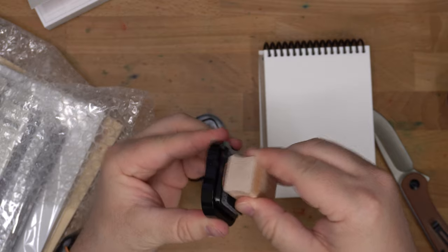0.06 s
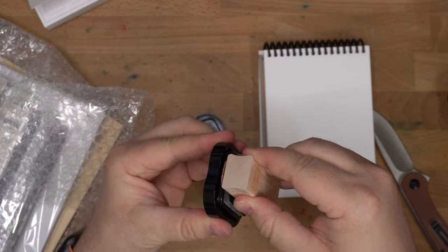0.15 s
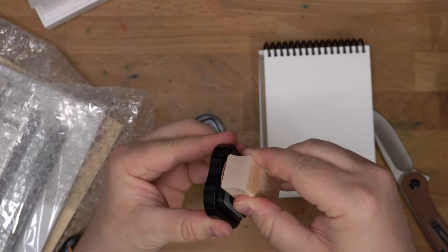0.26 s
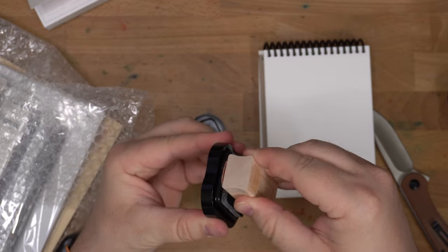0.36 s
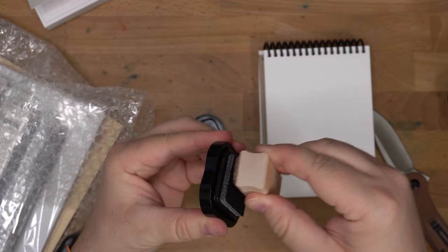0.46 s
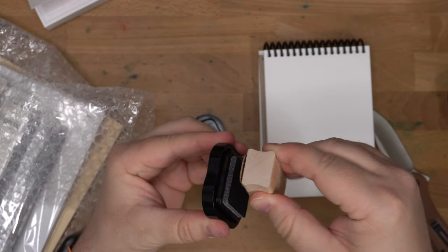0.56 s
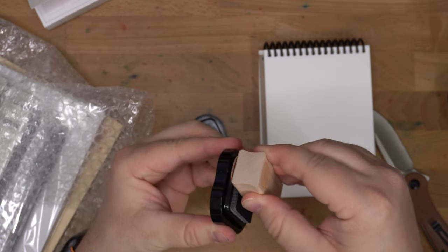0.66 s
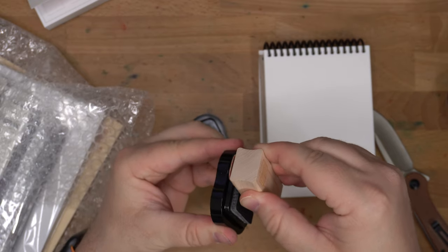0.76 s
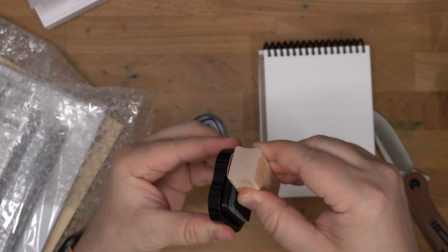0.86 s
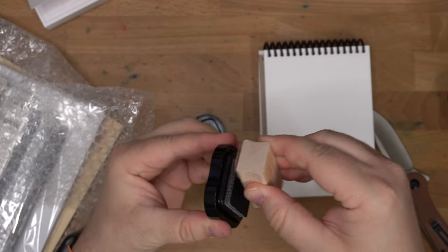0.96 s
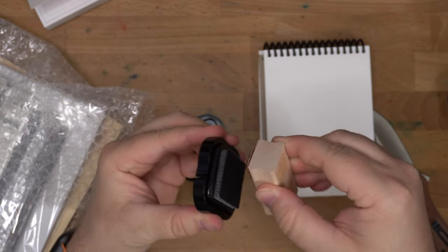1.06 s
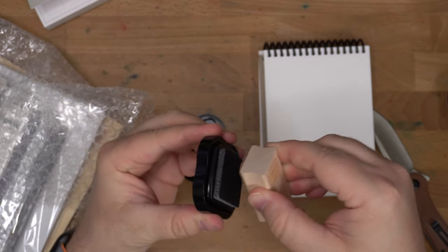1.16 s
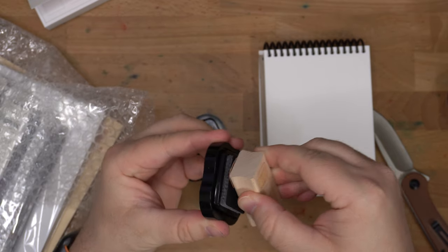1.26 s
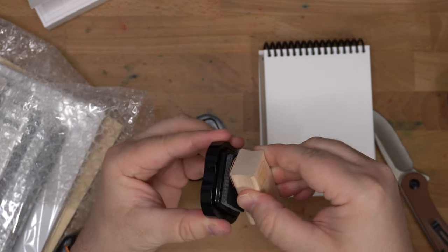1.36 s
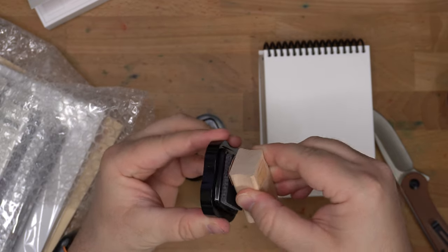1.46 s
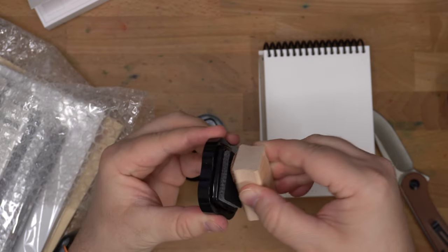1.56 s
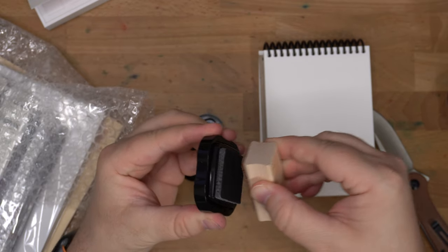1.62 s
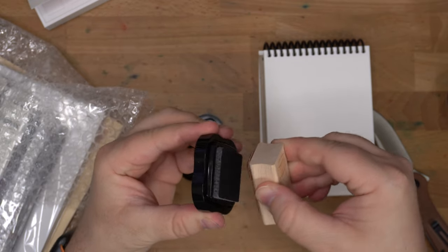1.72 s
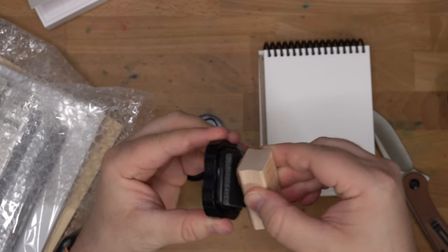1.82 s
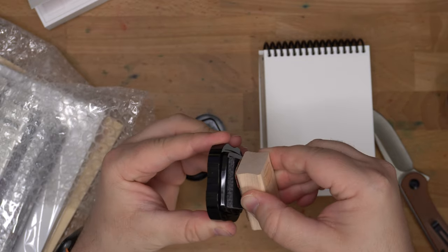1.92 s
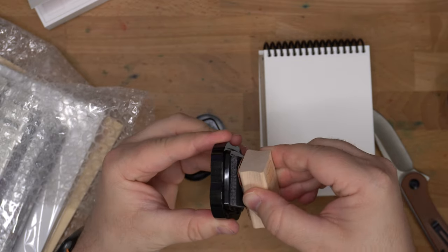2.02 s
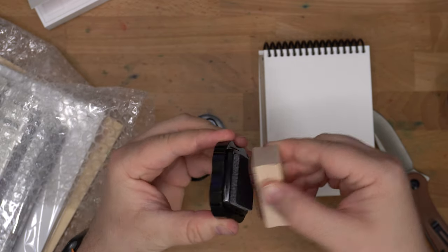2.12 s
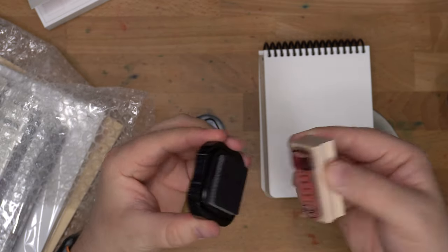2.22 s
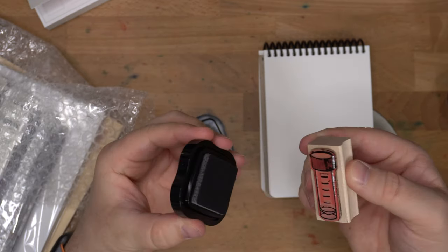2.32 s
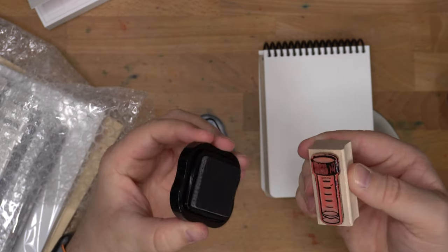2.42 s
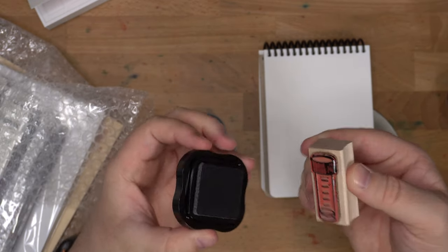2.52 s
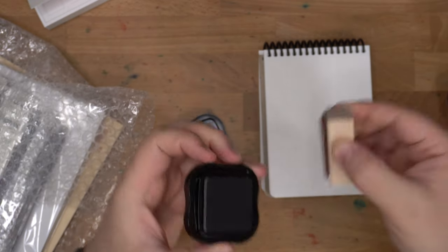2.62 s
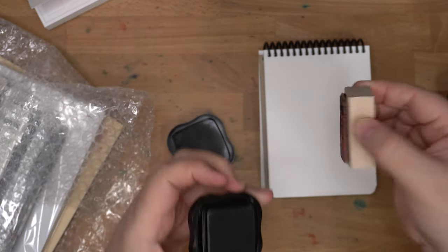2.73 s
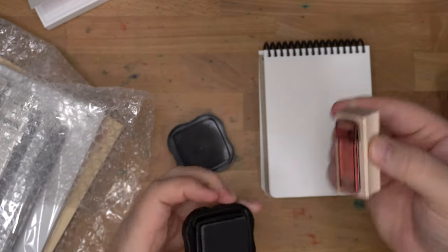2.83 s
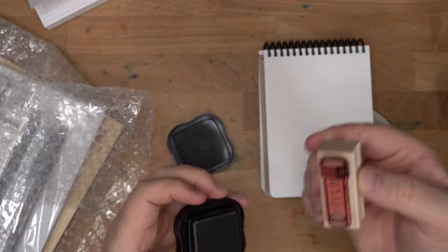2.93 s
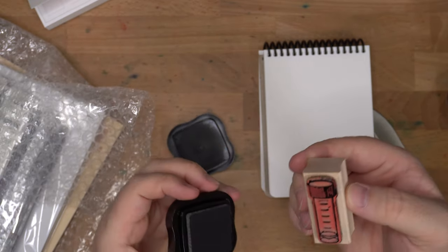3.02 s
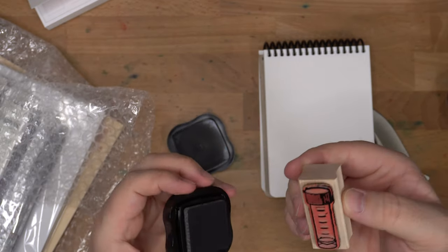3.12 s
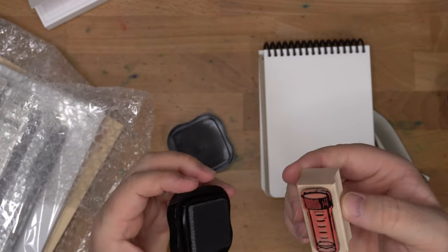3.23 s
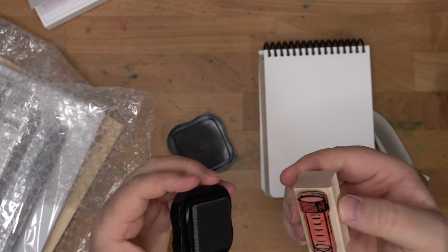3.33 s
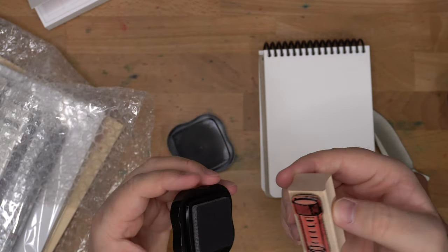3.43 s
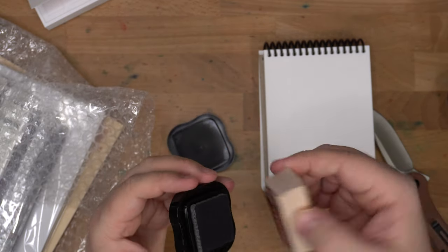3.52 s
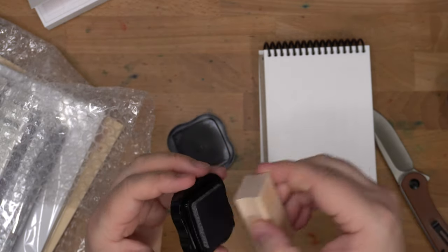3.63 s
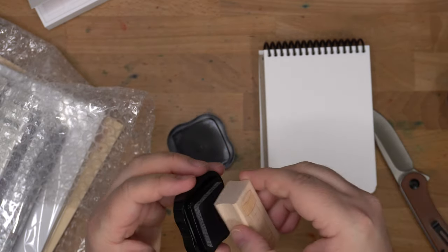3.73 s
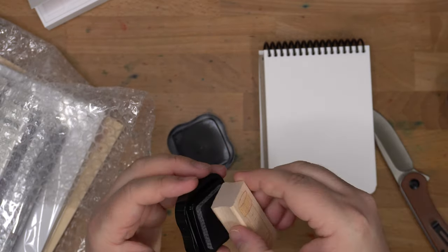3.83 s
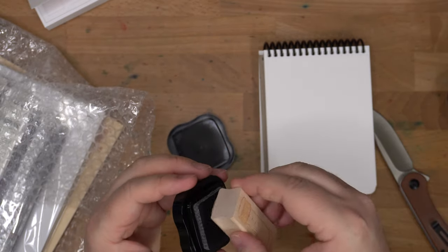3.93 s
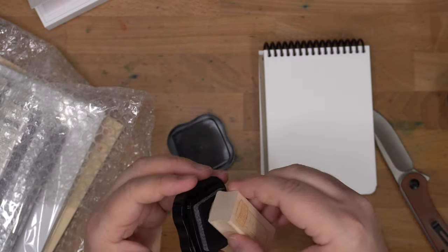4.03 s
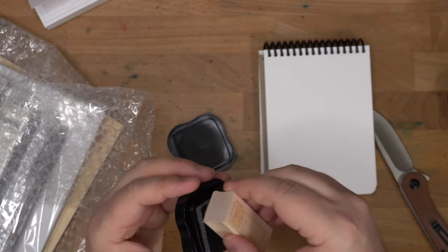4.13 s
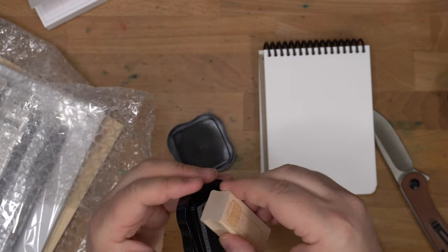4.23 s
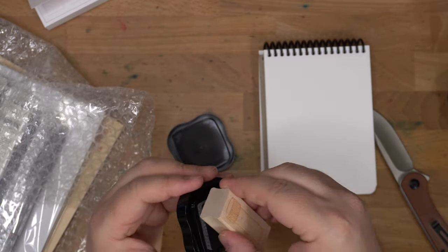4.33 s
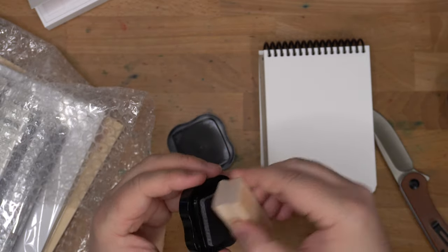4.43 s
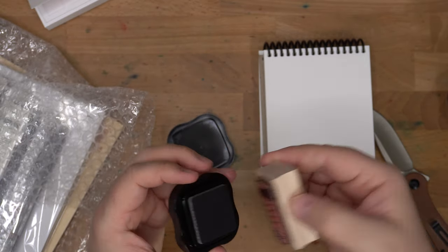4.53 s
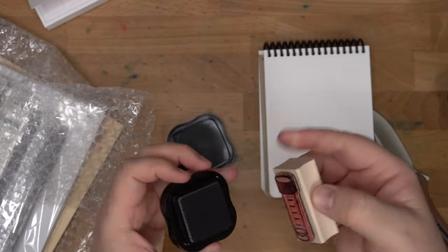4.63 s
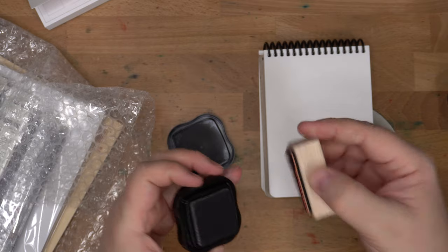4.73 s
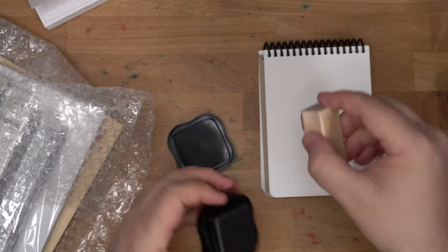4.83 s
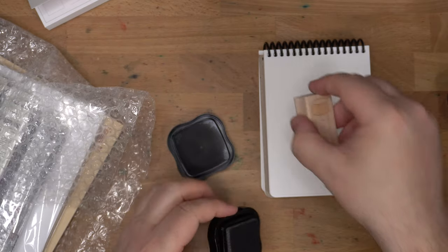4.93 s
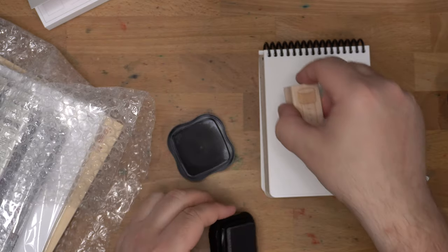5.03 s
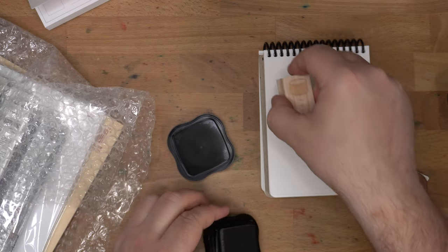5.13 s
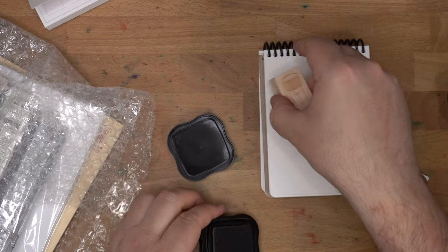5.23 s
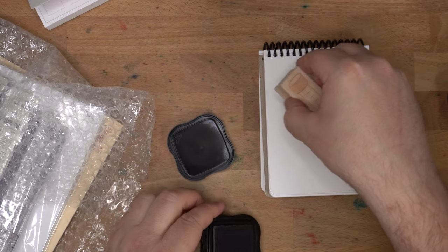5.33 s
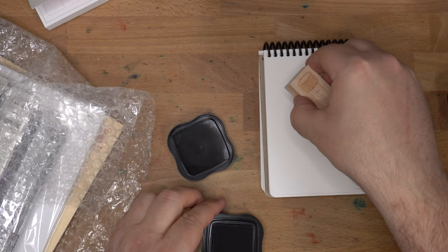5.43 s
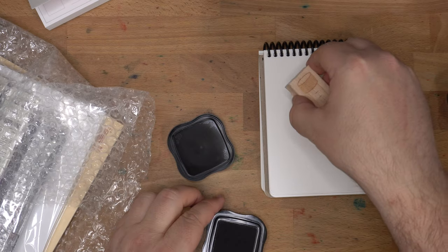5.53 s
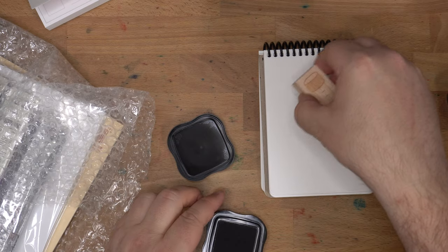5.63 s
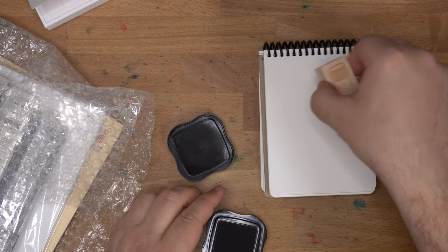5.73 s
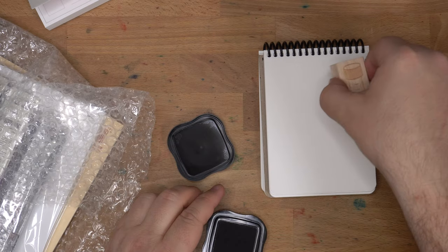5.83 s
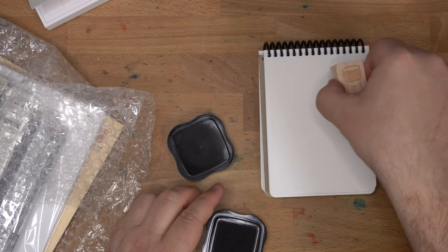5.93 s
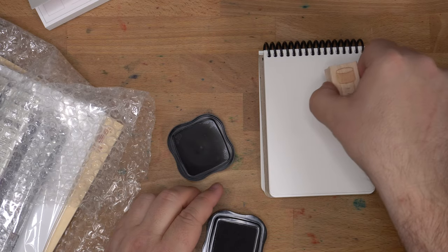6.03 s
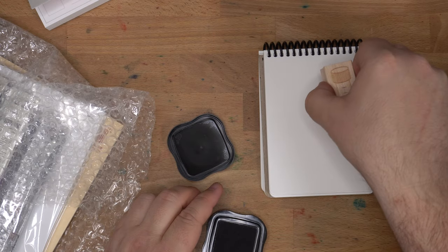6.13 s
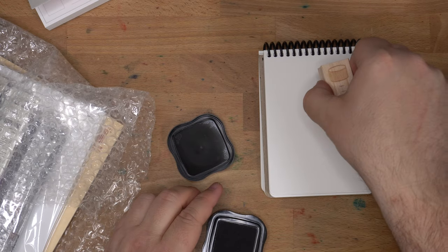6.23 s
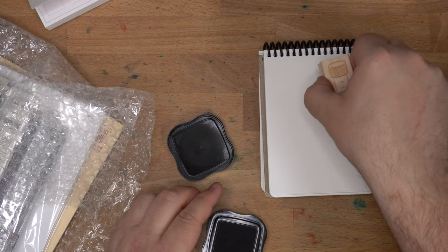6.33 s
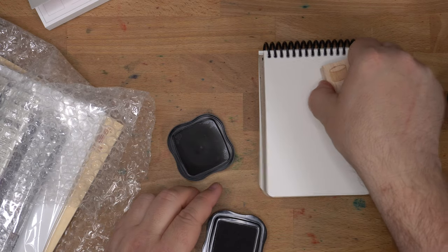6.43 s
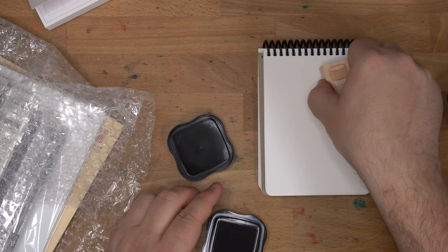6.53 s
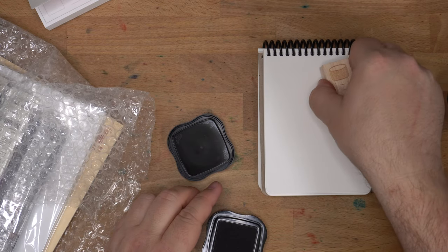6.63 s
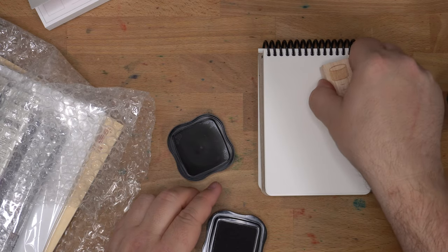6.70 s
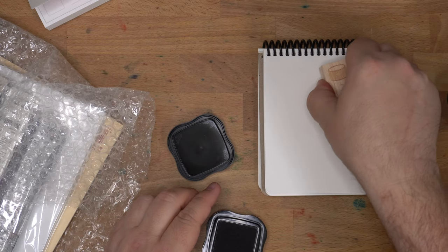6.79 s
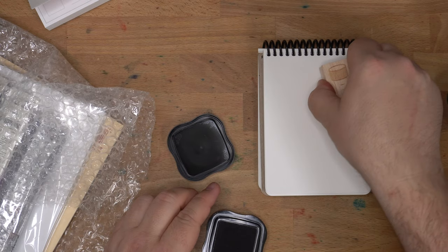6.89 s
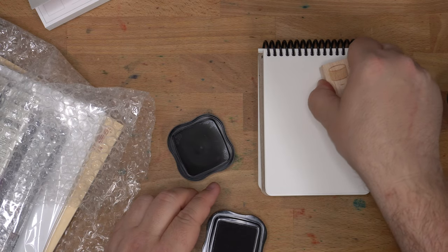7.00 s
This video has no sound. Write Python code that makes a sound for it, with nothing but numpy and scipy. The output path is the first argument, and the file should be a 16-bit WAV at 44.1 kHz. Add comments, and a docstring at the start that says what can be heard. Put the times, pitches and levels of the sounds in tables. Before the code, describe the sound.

A quiet, small room heard close up, with soft hush, low rumble, a faint low hum and barely audible hiss and thin high tone. From 0 to 2.2 s a rubber stamp is dabbed on a hand-held ink pad: sparse, tiny sticky ticks and a few dull taps. Around 2.4 to 2.6 s the ticks are crisper, then faint crackly handling and soft skin and sleeve brushes continue to 3.6 s. More sparse ticks follow, with a clearer one at 4.6 s and a brush near 4.85 s. At 5.1 s a light knock hits the wooden desk. At 5.45 to 5.6 s the plastic case lands and rattles brightly to rest, the loudest moment. At 6.5 s the stamp is pressed down with quick woody knocks, a low desk boom and a paper rustle; a weaker knock comes at 6.7 s, then faint ticks and hush until 7 s.

```python
"""Inking and pressing a rubber stamp

Hands dab a rubber stamp on an ink pad in a quiet room: noise snaps make the ticks of sticky ink, and soft swells
of noise the brushing skin and sleeve and the rustling paper. The plastic pad case is set on a wooden desk and
rattles, then the desk is knocked as the stamp is pressed down: noise cracks and fading sine tones make both.
Below it all, shaped noise and sines make room hush, hiss, a slow rumble, a hum in the desk and a thin steady tone."""
import sys
import numpy as np
from scipy import signal
from scipy.fft import rfft, irfft
from scipy.io import wavfile

SR = 44100
rng = np.random.default_rng(int(sys.argv[2]) if len(sys.argv) > 2 else 0)


def generate_wav(signal):
    """Clip the signal to [-1, 1] and save it as 16-bit WAV at the path in sys.argv[1]."""
    frames = np.transpose(np.atleast_2d(signal))
    scaled = np.clip(frames, -1, 1) * 32767
    pcm = np.round(scaled).astype(np.int16)
    wavfile.write(sys.argv[1], SR, pcm)


N = 311300   # length of the scene in samples


def from_db(db):
    """Turn decibels into an amplitude factor."""
    return 10 ** (np.asarray(db) / 20)


def rms_one(x):
    """Scale a sound to an average strength (rms) of 1."""
    return x / np.sqrt(np.mean(x ** 2) + 1e-20)


def level_over_time(rows):
    """Join (time, level) points by straight lines, one value per sample."""
    times_s, levels_db = np.transpose(rows)
    return np.interp(np.arange(N) / SR, times_s, levels_db)


def sine(hz):
    """A steady pure tone, peak 1, as long as the scene."""
    return np.sin(2 * np.pi * hz * np.arange(N) / SR)


def coloured(spectrum):
    """Noise whose strength at each pitch follows the given (Hz, dB) curve, rms 1."""
    hz, db = np.transpose(spectrum)
    log_hz = np.log(np.arange(N // 2 + 1) * SR / N + .1)   # the small offset avoids log(0)
    gain = from_db(np.interp(log_hz, np.log(hz), db, -90, -90))
    return rms_one(irfft(rfft(rng.standard_normal(N)) * gain, N))


def band(x, low_hz, high_hz):
    """Keep mainly the part of a sound between two frequencies."""
    edges_hz = [low_hz, min(high_hz, .45 * SR)]
    return signal.sosfilt(signal.butter(2, edges_hz, "band", fs=SR, output="sos"), x)


def add(out, s, sound):
    """Mix a sound into out, starting at s seconds."""
    at = round(s * SR)
    out[at:at + len(sound)] += sound[:N - at]


def crack(low_hz, high_hz, t60):
    """The broad noisy snap of two hard surfaces meeting: noise falling 60 dB in t60 seconds; peak 1."""
    t = np.arange(round(2 * t60 * SR)) / SR
    fading = rng.standard_normal(len(t)) * from_db(-60 * t / t60)
    snap = band(fading, low_hz, high_hz)
    return snap / np.abs(snap).max()


def struck(modes, scatter_db, contact_s, favour_hz=None, favour_db=4.0, detune=0.029):
    """One blow: all modes build up during the contact and die away, those near favour_hz harder; peak 1."""
    hz, db, t60 = np.transpose(modes)[:, :, None]   # one row per mode
    t = np.arange(round((t60.max() + 4 * contact_s) * SR)) / SR
    db = db + scatter_db * rng.standard_normal(hz.shape)
    if favour_hz:
        octaves_away = np.log2(hz / favour_hz)
        db = db + favour_db * np.exp(-(octaves_away / 0.59) ** 2)
    # grip and support shift the modes a little
    hz = hz * (1 + detune * rng.standard_normal(hz.shape))
    # a rough contact starts each mode at its own phase
    phase = 2 * np.pi * (hz * t + rng.random(hz.shape))
    build = np.sin(np.pi / 2 * np.clip(t / contact_s, 0, 1)) ** 2
    fade = from_db(db - 60 * np.maximum(t - contact_s, 0) / t60)
    sound = build * np.sum(fade * np.sin(phase), axis=0)
    return sound / np.abs(sound).max()


def background():
    """Hush, hiss, rumble and sway as noise, noise singing in the lowest desk mode, and a thin tone."""
    # how loud the hush is: (time [s], level [dB])
    hush_level = [(0.0, -73), (0.6, -72.5), (1.2, -76), (4.4, -77), (4.8, -74.5), (5.4, -75), (5.75, -70.5),
                  (6.3, -74), (7.06, -73)]
    # how loud the desk hum is: (time [s], level [dB])
    hum_level = [(0.25, -84.5), (0.55, -75.5), (2.4, -76), (3.3, -84.5), (4.0, -88.5), (5.4, -86.5),
                 (5.8, -80), (7.06, -76)]
    # colour of the hush: (frequency [Hz], relative density [dB per Hz])
    hush_colour = [(59, -24.5), (100, -6), (181, -3.5), (253, 0), (281, -8), (319, -5), (467, -5),
                   (640, -9), (697, -8.5), (956, -14.5), (1840, -18.5), (2990, -25.5), (3690, -41.5),
                   (5070, -41), (15500, -44)]
    # colour of the rumble: (frequency [Hz], relative density [dB per Hz])
    rumble_colour = [(16, -32), (28, -5), (38, -9.5), (59, -3), (81, -7), (113, -8.5), (130, -6.5),
                     (170, -32), (290, -120)]
    # air pressure swaying, strongest below hearing: (frequency [Hz], relative density [dB per Hz])
    sway_colour = [(1.2, -28), (2.0, 6), (16, -2), (23, -8), (28, -11), (36, -39.5), (62, -120)]
    hush_db = level_over_time(hush_level)
    hum_db = level_over_time(hum_level)
    rumble_db = -78.5 + 1.6 * (hush_db + 76)   # the rumble swings more than the hush

    hum_noise = coloured([(110, -48.0), (139, -14.5), (145, -4.5), (152, -13), (190, -31.5)])
    hum = hum_noise + 0.8 * sine(145.4)   # the sine is the steady core
    tone_noise = coloured([(880, -17.5), (960, -0.5), (1100, -1.0), (1180, -18.5)])
    tone = sine(972) + 0.81 * tone_noise
    hiss = coloured([(1500, -5), (4000, 2.5), (13000, -3), (14300, -2), (14800, -22.5)])

    steady = from_db(-88.5) * tone + from_db(-88.5) * hiss + from_db(-68) * coloured(sway_colour)
    hush = from_db(hush_db) * coloured(hush_colour)
    rumble = from_db(rumble_db) * coloured(rumble_colour)
    return hush + from_db(hum_db) * hum + rumble + steady


def room(x):
    """Echoes blurred into a diffuse tail; the higher the band, the sooner it dies."""
    t = np.arange(round(.6 * SR)) / SR
    low, high, top = rng.standard_normal((3, len(t)))
    # each band falls 60 dB in 0.26, 0.25 or 0.2 s
    low = band(low, 220, 2500) * from_db(-60 * t / 0.26)
    high = band(high, 2500, 8400) * from_db(-6.0 - 60 * t / 0.25)
    top = band(top, 6100, 15000) * from_db(-5 - 60 * t / 0.2)
    tail = (low + high + top) * np.clip(t / .003, 0, 1)   # first walls answer after a few ms
    return signal.fftconvolve(x, tail / np.sqrt(np.sum(tail ** 2)))[:N]


def swishes():
    """Skin and sleeve brush past, and paper rustles as the stamp is pressed: grainy noise swells and fades."""
    # brushes, the last two paper: (middle [s], nominal length [s], of which 0.88 sounds, mid level [dB])
    soft_sounds = [(0.464, 0.067, -80.5), (2.434, 0.082, -79.5), (2.589, 0.069, -81), (2.698, 0.315, -76.5),
                   (2.934, 0.0564, -81.5), (3.158, 0.056, -82), (3.59, 0.0407, -84), (4.664, 0.105, -77.5),
                   (4.854, 0.28, -76), (4.997, 0.039, -83), (5.299, 0.085, -82.5), (5.382, 0.228, -82),
                   (6.529, .14, -68.5), (6.687, .06, -81)]
    colour_hz = 6343
    out = np.zeros(N)
    for middle_s, length_s, db in soft_sounds:
        swell = np.hanning(round(0.88 * length_s * SR))
        grain = rng.standard_normal(len(swell)) * from_db(5.2 * rng.standard_normal(len(swell)))
        friction = rms_one(band(grain, colour_hz / 4.7, colour_hz * 1.72))
        add(out, middle_s - len(swell) / SR / 2, from_db(db) * swell * friction)
    return out


def ticks():
    """Sticky ink and skin let go: a bright snap and a dying puff of tiny tearing threads; taps are duller snaps."""
    # ink and skin letting go: (time [s], snap peak [dB], colour [Hz])
    letting_go = [(0.0925, -70, 7430), (0.1229, -61.5, 3020), (0.262, -65, 4796), (0.4508, -61, 6580),
                  (0.673, -69.5, 7233), (0.9791, -62, 6280), (0.9963, -61.5, 6820), (1.1894, -67, 7764),
                  (1.2854, -72, 7630), (1.3913, -73.5, 7690), (1.8164, -70.5, 7500), (1.871, -67.5, 6610),
                  (1.8985, -71, 7683), (1.9943, -78, 8230), (2.156, -59.5, 5013), (2.4063, -53, 6119),
                  (2.526, -70, 7700), (2.5505, -55.5, 6070), (2.8558, -64, 3908), (2.922, -69.5, 5130),
                  (3.055, -69.5, 7620), (3.2336, -59.5, 6376), (3.2537, -70.5, 7166), (3.486, -63, 3200),
                  (3.6734, -70.5, 7500), (3.767, -71, 7318), (4.2976, -70.5, 7260), (4.3588, -68.5, 5436),
                  (4.4042, -73.5, 7830), (4.584, -52, 3920), (4.6686, -71, 7400), (4.835, -60, 6426),
                  (4.8787, -60.5, 5032), (5.0064, -67, 7826), (6.239, -68, 7740), (6.622, -65, 9880),
                  (6.8884, -66, 7716)]
    # dull taps of stamp and fingers on the hand-held case: (time [s], peak [dB], colour [Hz])
    dull_taps = [(0.125, -55.5, 900), (.197, -67, 1000), (.263, -62.5, 1610), (0.977, -63.5, 1090),
                 (1.325, -62, 375.8), (2.405, -80, 2200), (2.551, -73, 2000), (3.486, -73.5, 1806),
                 (4.584, -66, 2508), (5.336, -64, 2210), (6.295, -68.5, 2010)]
    out = np.zeros(N)
    t = np.arange(round(.08 * SR)) / SR
    # fainter ticks come at random while the fingers turn the stamp over
    start_s, end_s, faint_db = 2.3, 3.55, -71.5
    faint = []
    for when, pitch in rng.random((14, 2)):
        faint.append((start_s + (end_s - start_s) * when, faint_db, 3000 * 3.0 ** pitch))
    for s, peak_db, colour_hz in letting_go + faint:
        add(out, s, from_db(peak_db) * crack(colour_hz / 4.17, colour_hz * 2.054, t60=0.0124))
        # stronger ticks have louder puffs; brighter ticks are stickier: 12 dB more per octave
        puff_db = -78.5 + 0.29 * (peak_db + 68) + 12 * np.log2(colour_hz / 7000)
        puff = rms_one(band(rng.standard_normal(len(t)), colour_hz / 1.111, colour_hz * 1.103))
        add(out, s, from_db(puff_db - 60 * t / 0.0732) * puff)
    for s, peak_db, colour_hz in dull_taps:
        add(out, s, from_db(peak_db) * crack(colour_hz / 2.75, colour_hz * 1.16, t60=0.0166))
    return out


def thumps():
    """The lowest desk modes swell slowly after a blow and the frame shudders; one deep push lies under them."""
    # pushes that set the whole desk top booming: (time [s], boom peak [dB])
    pushes = [(5.108, -47), (5.495, -51.5), (5.545, -55), (6.495, -46), (6.532, -49.5), (6.546, -35.5),
              (6.706, -50), (6.828, -58.5)]
    # lowest desk modes: (typical frequency [Hz], typical relative level [dB], time to fall 60 dB [s])
    boom_modes = [(147.56, -14.5, 0.24), (169.1, -24.5, 0.3)]
    out = np.zeros(N)
    for s, db in pushes:
        add(out, s, from_db(db) * struck(boom_modes, scatter_db=3.5, contact_s=0.021, detune=0.0048))
        add(out, s, from_db(db - 17.5) * crack(45, 420, t60=0.96))   # shudder of the frame
    # the hand's weight lands with a deep push
    add(out, 6.478, from_db(-45.5) * crack(35, 110.4, t60=0.2492))
    return out


def knocks():
    """Blows on the desk: a broad crack with one stronger colour, woody desk modes and a diffuse thud."""
    # blows: (time [s], crack peak [dB], knock peak [dB], knock colour [Hz])
    blows = [(5.0987, -30, -33.5, 1480), (5.1061, -43, -42, 1105), (6.4779, -33, -35, 408),
             (6.4843, -54.5, -32.5, 759), (6.5026, -40, -35.5, 775), (6.5348, -51.5, -31.5, 666),
             (6.539, -47, -34.5, 677), (6.5514, -48.5, -32, 757), (6.5544, -52.5, -35.5, 392.7),
             (6.5607, -56.5, -40.5, 720.5), (6.5712, -65.5, -39, 581.4), (6.6911, -57.5, -43, 933),
             (6.6987, -67, -40, 749)]
    # desk top modes: (typical frequency [Hz], typical relative level [dB], time to fall 60 dB [s])
    desk_modes = [(227, -6, 0.029), (267.7, -7.5, 0.098), (323.8, -9.5, 0.0485), (397, -7, 0.16),
                  (486.7, 0.5, 0.0122), (609.2, -1.5, 0.0606), (650, -9, 0.12), (741.04, 1.5, 0.0236),
                  (838, 0.5, 0.0159), (885, -9, 0.0183), (1099.8, -0.5, 0.0442), (1294, -15.5, .03),
                  (1357.4, 2, 0.0201), (1635, -11, 0.067), (1746, -6, 0.025), (1661.8, -9, 0.0128),
                  (1955, -21, 0.0082), (2227, -11.5, 0.004), (2730, -14.5, 0.0114), (2793, -15, 0.0118),
                  (3210, -33.5, 0.0086)]
    crack_hz = 6155   # the stronger colour of the cracks
    out = np.zeros(N)
    for s, crack_db, knock_db, knock_hz in blows:
        add(out, s, from_db(crack_db) * crack(1340, 9930, t60=0.0152))
        add(out, s, from_db(crack_db - 6.5) * crack(crack_hz / 1.245, crack_hz * 1.068, t60=0.0423))
        wood = struck(desk_modes, scatter_db=3.5, contact_s=0.000794, favour_hz=knock_hz, favour_db=6.5)
        add(out, s, from_db(knock_db) * wood)
        add(out, s, from_db(knock_db - 6.5) * crack(knock_hz / 2.53, knock_hz * 1.45, t60=0.0483))
    return out


def rattle():
    """The case touches down and rocks to rest: each touch snaps, rings the plastic and sounds the hollow."""
    # touches of the case on the desk: (time [s], click peak [dB])
    touches = [(5.0981, -30.5), (5.452, -29.5), (5.4573, -36), (5.4817, -16.5), (5.49, -14), (5.494, -15),
               (5.5011, -21.5), (5.5161, -31.5), (5.5274, -28), (5.535, -23), (5.542, -17.5),
               (5.5464, -22.5), (5.5522, -25), (5.5723, -24), (5.5767, -23), (5.583, -26), (5.5884, -31),
               (5.5969, -34)]
    # plastic wall modes: (typical frequency [Hz], typical relative level [dB], time to fall 60 dB [s])
    wall_modes = [(3050, -10, .005), (3570, -1, 0.001), (4087, -6, 0.012), (4367, -2.5, .007),
                  (4740, -3, 0.0076), (4984, -4.5, 0.02), (5345, 0, 0.0036), (5744, -7.5, 0.0048),
                  (6300, -10.5, 0.0076), (7030, -11.5, .004)]
    # lower modes, the hollow: (typical frequency [Hz], typical relative level [dB], time to fall 60 dB [s])
    hollow_modes = [(420, -17.5, 0.026), (607, -19, 0.0205), (689, -18.5, 0.027), (850, -12, .012),
                    (1030, -10.5, .012), (1357, -7, .012), (1480, 4, 0.0068), (1709, -8, 0.013),
                    (1922, -11, .01), (2285, -4, 0.0087), (2547, -3, 0.018), (2850, -9.5, .008)]
    out = np.zeros(N)
    # small touches fill in at random while the case rocks
    start_s, end_s, small_db, scatter_db = 5.5, 5.605, -35, 1.5
    small = []
    for when, size in rng.random((12, 2)):
        small.append((start_s + (end_s - start_s) * when, small_db + scatter_db * (2 * size - 1)))
    for s, click_db in touches + small:
        walls = struck(wall_modes, scatter_db=6.0, contact_s=0.0014, favour_hz=4950)
        add(out, s, from_db(click_db) * walls)
        add(out, s, from_db(click_db - 11.5) * crack(3900, 13180, t60=0.013))
        hollow_db = -33.5 + 0.63 * (click_db + 27)   # the hollow varies less than the click
        add(out, s, from_db(hollow_db) * struck(hollow_modes, scatter_db=3.0, contact_s=.0015))
    return out


def scene():
    """Mix all sources, with room echoes of the case, the desk knocks and the ticks."""
    clicks = rattle()
    blows = knocks()
    near = ticks()
    wet = room(from_db(-12.0) * clicks + from_db(-11.5) * blows + from_db(-8.0) * near)
    return (clicks + blows + thumps() + near + wet + swishes() + background())[None]


def record(dry):
    """Cut the top: from 16500 Hz up everything is at least 60 dB weaker."""
    return signal.sosfilt(signal.cheby2(12, 60, 16500, fs=SR, output="sos"), dry)


dry = scene()
out = record(dry)
generate_wav(out)
```